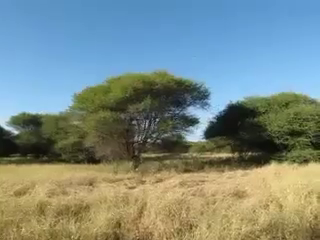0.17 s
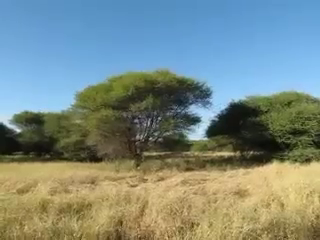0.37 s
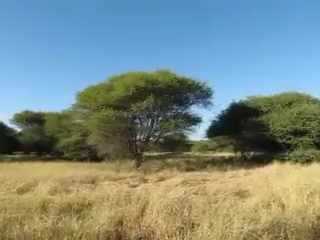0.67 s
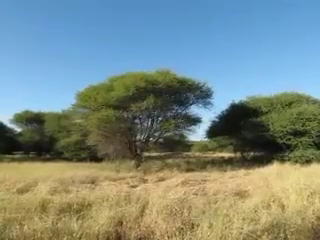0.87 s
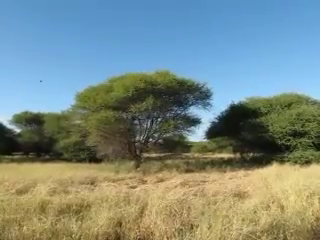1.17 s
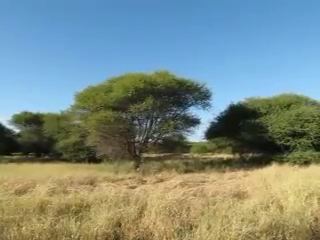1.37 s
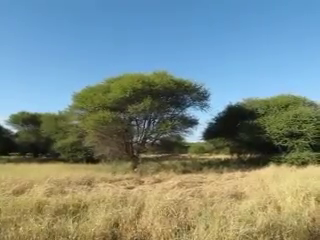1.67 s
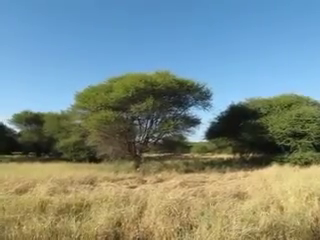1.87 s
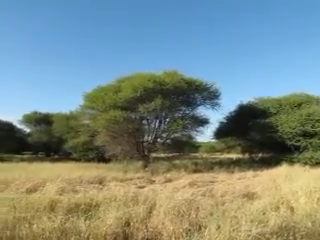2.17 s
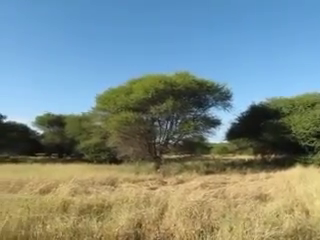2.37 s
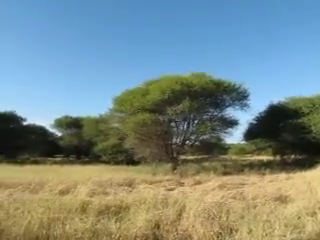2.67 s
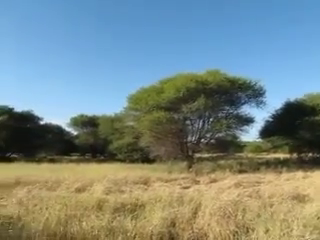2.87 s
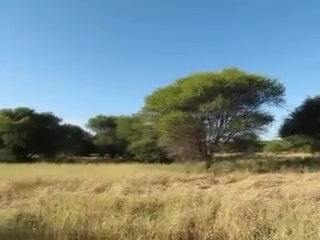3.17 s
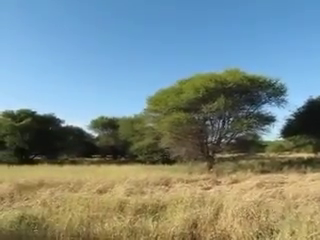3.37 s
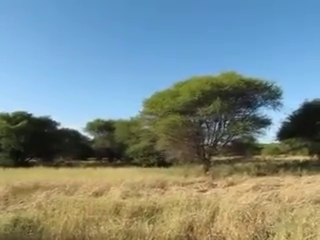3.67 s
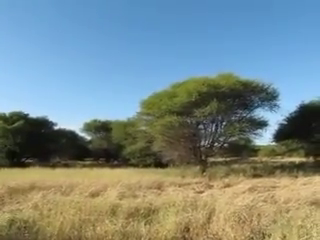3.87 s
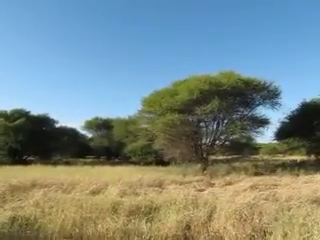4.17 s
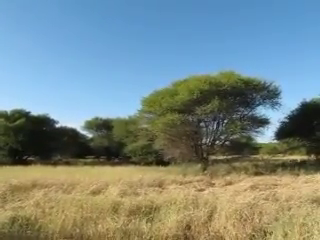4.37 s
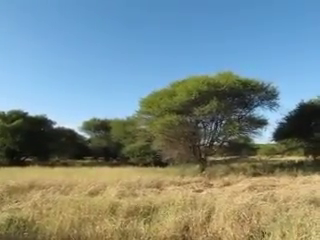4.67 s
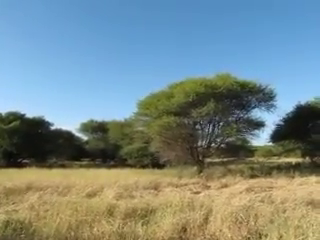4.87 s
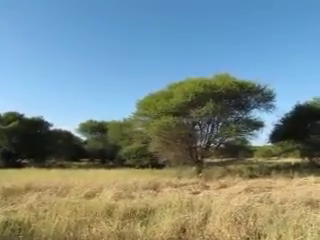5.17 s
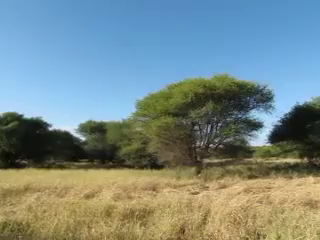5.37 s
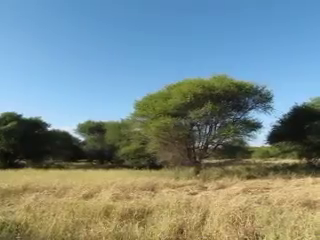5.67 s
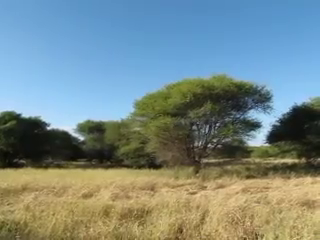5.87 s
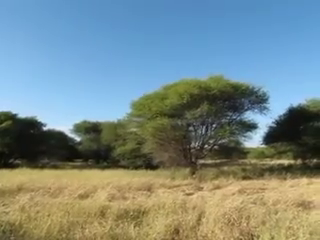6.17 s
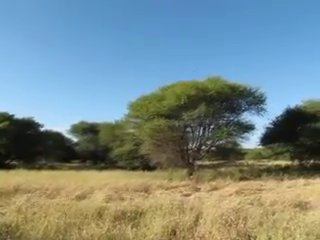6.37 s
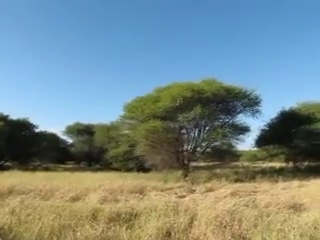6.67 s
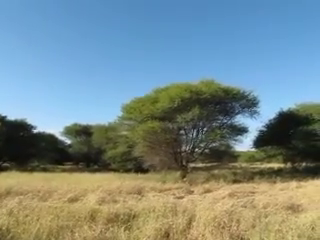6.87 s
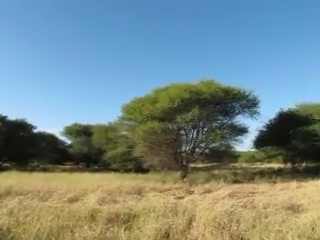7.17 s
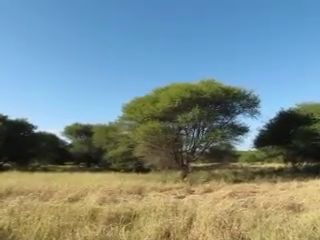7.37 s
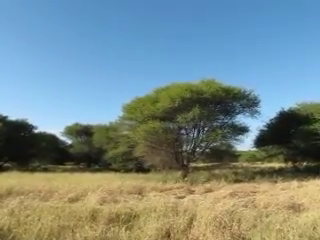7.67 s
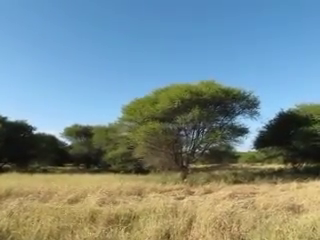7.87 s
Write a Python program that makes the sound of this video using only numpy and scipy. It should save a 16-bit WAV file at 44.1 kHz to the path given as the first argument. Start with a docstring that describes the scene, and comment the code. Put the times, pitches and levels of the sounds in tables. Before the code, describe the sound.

A vast distant colony of begging nestlings merges into a steady, high, rasping hiss over dry bushland, with faint brief adult chirps flickering through it.

```python
"""Thorn trees at a distance, two microphone ports in nearly still air. After a short silence the din sets in:
a huge colony of begging nestlings, thousands of rasping calls melted into a high hiss, over a low wash of noise.
A faint breeze (low noise) and a thin camera whine (wavering sine) lie under it; adult chirps (gliding sines)
come through at once, a camera knock (two decaying sines) at 0.3 s, and from 3.4 s wind puffs on the ports."""
import sys
import numpy as np
from scipy import signal
from scipy.fft import rfft, irfft
from scipy.io import wavfile
from scipy.ndimage import uniform_filter1d

SR = 44100
rng = np.random.default_rng(int(sys.argv[2]) if len(sys.argv) > 2 else 0)


def int16_out(signal):
    """Quantize to a 16-bit WAV file."""
    q = np.round(np.clip(np.atleast_2d(signal).T, -1, 1) * 32767)
    wavfile.write(sys.argv[1], SR, q.astype(np.int16))


N = 354211

# Drift of the distant colony: [t/s, level/dB, left minus right/dB]
COLONY_DRIFT = [(0.2, -19, 0), (1.0, -17.5, -0.8), (2.0, -18.9, -0.9), (3.0, -18.5, -0.5),
                (3.8, -18.9, -1.5), (5.4, -19.5, -0.3), (6.3, -18.5, -1), (7.2, -19, -0.9),
                (8.0, -19.5, -1.2)]
# Colour of the begging din, relative: [f/Hz, level/dB per Hz]
BEGGING_COLOUR = [(1060, -39), (1800, -31.5), (3250, -19), (4470, -4.5), (5610, -2.5), (6370, 2),
                  (6970, -1), (8290, -12.5), (10600, -18), (11900, -23.5), (13100, -32.5), (14800, -36.5),
                  (15800, -40)]
# Likeness of the two ports: [f/Hz, correlation from -1 to 1]
PORT_LIKENESS = [(50, 1), (140, 0.78), (550, 0.74), (1700, 0.73), (2250, 0.32), (2700, -0.031),
                 (4800, -0.0028), (6000, -0.35), (8500, -0.3), (9700, 0.041), (12000, -0.081),
                 (12700, -0.12), (13300, 0.16), (14500, .5)]
# Colour difference of the ports: [f/Hz, left minus right/dB]
PORT_LEAN = [(100, -0.5), (500, 0), (1150, -1.3), (1450, 0.5), (2300, -2.5), (3300, -1.9), (3800, 1),
             (5000, 2.5), (6300, -2.6), (7800, 0.7), (10000, -2), (13000, 0.5)]
# Colour of the still air and the microphone, relative: [f/Hz, level/dB per Hz]
AIR_COLOUR = [(18, -45), (30, -11), (97, -5), (195, -10.5), (350, -6.5), (892, -6.5), (1110, -4.5),
              (1760, -6.5), (2400, -6.5), (3120, -3.5), (5280, -120)]
# Colour of wind on the ports, relative: [f/Hz, level/dB per Hz]
WIND_COLOUR = [(15, -33), (25, 7), (49, -0.5), (97, -0.5), (113, -0.5), (204, -19), (250, -14.5),
               (320, -48), (550, -120)]
# Nearer adult chirps: [t/s, length/s, start f/Hz, middle f/Hz, end f/Hz, level/dB,
# left minus right/dB, hoarseness from 0 to 1]
NEAR_CHIRPS = [(0.183, .025, 2580, 2470, 2300, -44, -8, 0.5), (2.563, 0.061, 2060, 2510, 2180, -45, -6, .8),
               (2.627, 0.031, 2150, 2390, 2520, -46, -6, .5),
               (3.873, 0.019, 3250, 2990, 2730, -35.5, -2, .9), (4.03, 0.049, 2970, 2730, 2440, -44, 6, .5),
               (4.708, 0.038, 2400, 2410, 2380, -44, -8, 0.9),
               (6.69, 0.024, 2550, 2500, 2360, -42, -8, 0.5), (7.49, .074, 3750, 2630, 2400, -42, -4, .1),
               (8.015, 0.014, 2900, 2950, 2950, -39, 5, 0.4)]
# Ringing of the knocked camera body: [f/Hz, level/dB, time to fall 60 dB/s]
KNOCK_MODES = [(614, -36, 0.033), (1040, -41, 0.024)]
# Puffs of wind on the ports: [t/s, length before the fall/s, level/dB, left minus right/dB]
WIND_PUFFS = [(3.386, 0.051, -60, 20), (3.46, 0.11, -63, 2), (5.83, 0.2, -58.5, 23), (6.0, .4, -63, -2),
              (6.34, .05, -64, 10), (6.85, .04, -62, -8), (7.02, 0.094, -60, 24), (7.08, .1, -53, -10),
              (7.156, 0.072, -54.5, 20), (7.24, 0.064, -63, -8), (7.35, 0.092, -56, 5)]

START_S, EDGE_HZ = 0.1188, 15790  # onset of all sound, upper band limit
SWELL_DB, TREBLE_SWELL_DB, SWELL_S = 0.5, 0.6, 0.066  # quick random swells of the din, and of its treble alone
AIR_DB, BREEZE_DB = -49, -77
PUFF_RISE_S, PUFF_FALL_S = 0.02, 0.028
WHINE_HZ, WHINE_DB = 1154.3, -67.5
FAR_CHIRPS, FAR_DB = 160, -54.5  # count, and level of the lowest and farthest
KNOCK_S, KNOCK_PAN_DB = 0.326, -4  # moment, left minus right


def amp(db):
    """Amplitude factor for a level in dB."""
    return 10 ** (np.asarray(db) / 20)


def evened(x):
    """Scale to rms 1."""
    return x / np.sqrt(np.mean(x ** 2) + 1e-20)


def read(points, hz):
    """Read a curve at frequencies hz, straight between points on a log frequency axis."""
    f, value = np.transpose(points)
    return np.interp(np.log(hz + 1), np.log(f + 1), value)


def sides(pan_db):
    """Gains of the left and right port."""
    return amp([pan_db / 2, -pan_db / 2])


def add(mix, s, sound):
    """Lay a two-port sound into the mix at s seconds."""
    part = mix[:, round(s * SR):][:, :sound.shape[1]]
    part += sound[:, :part.shape[1]]


def wander(count, width):
    """Random curve of rms 1 with lumps about width steps long."""
    width = max(round(width), 1)
    smooth = uniform_filter1d(rng.standard_normal(count), width)
    return evened(uniform_filter1d(smooth, width))


def grid(size):
    """Frame times and bin frequencies of short-time spectra."""
    return np.arange(4 * N // size + 5) * size / 4 / SR, np.fft.rfftfreq(size, 1 / SR)


def hiss(gain, size):
    """Noise from random spectra under gain (source, bin, frame): one source both ports share, one they do not."""
    t, hz = grid(size)
    a, b, c, d = rng.standard_normal((len(t), len(hz), 4)).T
    shared = gain[0] * (a + 1j * b)
    apart = gain[1] * (c + 1j * d)
    same = np.clip(read(PORT_LIKENESS, hz), -1, 1)[:, None]
    right = same * shared + np.sqrt(1 - same ** 2) * apart
    spectra = np.array([shared, right]) * sides(read(PORT_LEAN, hz))[:, :, None]
    return evened(signal.istft(spectra, nperseg=size, noverlap=3 * size // 4)[1][:, :N])


def colony(calls_per_s=16000, call_s=0.02, width_hz=400, fall_hz=150, spread_db=3.0):
    """Each call is a falling band of rasp; near nests are louder than far ones, and their powers add."""
    t, hz = grid(size=512)
    # calls_per_s holds for each of the two hiss sources, over all bins
    starts = rng.random((2, len(t), len(hz))) < calls_per_s * t[1] / len(hz)
    nearness = np.minimum(rng.exponential(1, starts.shape), 4)
    power = starts * amp(2 * spread_db * nearness)  # doubled dB because this is power

    along, off = np.meshgrid(t[:80] / call_s, hz[1] * np.arange(-30, 31), indexing="ij")
    band = np.exp(-((off + fall_hz * (along - 0.5)) / width_hz) ** 2)
    call = along * np.exp(-2 * along) * band  # quick rise, slower fade
    power = abs(signal.fftconvolve(power, call[None], axes=(1, 2)))
    power = power[:, :len(t), 30:30 + len(hz)].transpose(0, 2, 1)

    # the treble share grows from 0 to 1 over a quarter octave above 6500 Hz
    treble = np.clip(np.log2((hz[:, None] + 1) / 6500) / 0.25, 0, 1)
    treble_swell_db = treble * TREBLE_SWELL_DB * wander(len(t), SWELL_S / t[1])
    swell_db = SWELL_DB * wander(len(t), SWELL_S / t[1])
    colour_db = read(BEGGING_COLOUR, hz)[:, None] + treble_swell_db + swell_db

    din = hiss(np.sqrt(power) * amp(colour_db), size=512)
    s, din_db, pan_db = np.transpose(COLONY_DRIFT)
    now = np.arange(N) / SR
    return din * amp(np.interp(now, s, din_db)) * sides(np.interp(now, s, pan_db))


def air():
    """Smooth low wash of the open bush and the microphone: steady coloured noise."""
    t, hz = grid(size=2048)
    colour = amp(read(AIR_COLOUR, hz))[:, None]
    return amp(AIR_DB) * hiss([colour] * 2, size=2048)


def wind():
    """Lumpy rumble, unrelated in the two ports: a faint breeze, and puffs that rise, hold and die."""
    colour = amp(read(WIND_COLOUR, np.fft.rfftfreq(N, 1 / SR)))
    rumble = evened(irfft(rfft(rng.standard_normal((2, N))) * colour, N))
    force = np.full((2, N), amp(BREEZE_DB))
    now = np.arange(N) / SR
    for s, length, db, pan_db in WIND_PUFFS:
        rise = np.clip((now - s) / PUFF_RISE_S, 0, 1)
        fall = np.exp(-np.maximum(now - s - length, 0) / PUFF_FALL_S)
        force += amp(db) * sides(pan_db)[:, None] * rise * fall
    return force * rumble


def camera_whine():
    """A thin steady tone whose strength wavers, alike in both ports."""
    t = np.arange(N) / SR
    waver = 1 + 0.5 * wander(N, 6000)
    whine = amp(WHINE_DB) * waver * np.sin(2 * np.pi * WHINE_HZ * t)
    return np.array([whine] * 2)


def chirp(length, start_hz, middle_hz, end_hz, db, pan_db, hoarse):
    """A short gliding whistle with a hoarse flutter, smeared by leaves on its way and so unlike in the ports."""
    u = np.linspace(0, 1, round(length * SR))
    glide = np.interp(u, [0, 0.5, 1], [start_hz, middle_hz, end_hz])
    hz = uniform_filter1d(glide, len(u) // 4)
    rough = evened(uniform_filter1d(rng.standard_normal((2, 5000)), 70))
    flutter = 1 + hoarse * rough[:, :len(u)]
    swell = np.sqrt(np.sin(np.pi * u) + 1e-9)
    whistle = swell * np.sin(2 * np.pi * np.cumsum(hz) / SR)
    return amp(db) * sides(pan_db)[:, None] * flutter * whistle


def adults():
    """The near chirps, and many faint ones deeper in the trees at random moments, mostly falling."""
    out = np.zeros((2, N))
    for s, *call in NEAR_CHIRPS:
        add(out, s, chirp(*call))
    for when, long, pitch, rise, fall, near, side in rng.random((FAR_CHIRPS, 7)):
        length = 0.0197 + 0.042 * long
        hz = 2100 + 1300 * pitch
        start_hz, end_hz = hz + 500 * (rise - 0.4), hz - 400 * fall
        db = FAR_DB + 6.3 * near + 6.0 * pitch
        pan_db = 12 * (side - 0.5)
        add(out, when * N / SR, chirp(length, start_hz, hz, end_hz, db, pan_db, hoarse=0.67))
    return out


def camera_knock():
    """One dull knock on the camera body: two decaying modes behind a soft attack."""
    out = np.zeros((2, N))
    t = np.arange(3000) / SR
    ringing = sum(amp(db - 60 * t / t60) * np.sin(2 * np.pi * hz * t) for hz, db, t60 in KNOCK_MODES)
    attack = 1 - np.exp(-t / 0.002)
    add(out, KNOCK_S, sides(KNOCK_PAN_DB)[:, None] * ringing * attack)
    return out


def scene():
    """Distant din, air, wind on the ports, camera and adult birds together."""
    return colony() + air() + wind() + camera_whine() + adults() + camera_knock()


def record(dry):
    """The sound sets in abruptly after a short silence; then the band limit."""
    onset = np.clip((np.arange(N) / SR - START_S) / 0.0014, 0, 1)
    lowpass = signal.firwin(1535, EDGE_HZ, window=("kaiser", 9), fs=SR)
    return signal.oaconvolve(dry * onset, lowpass[None], "same")


dry = scene()
out = record(dry)
int16_out(out)
```